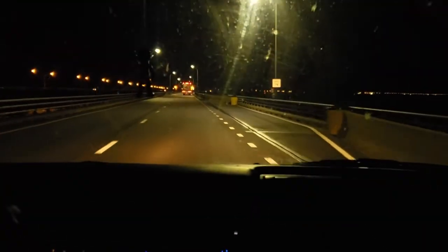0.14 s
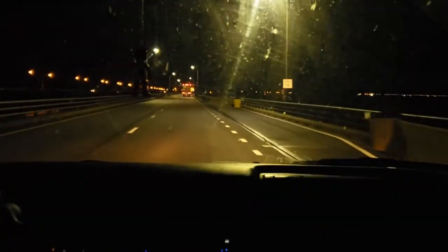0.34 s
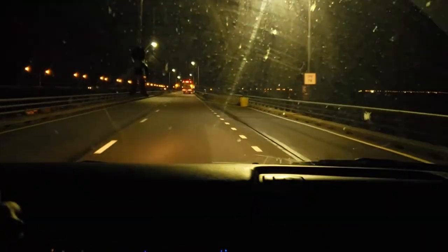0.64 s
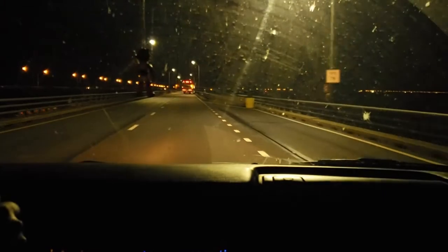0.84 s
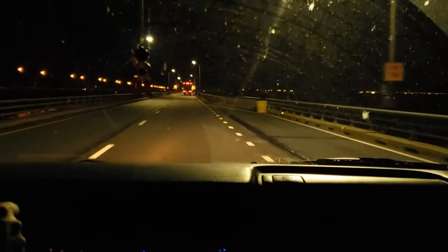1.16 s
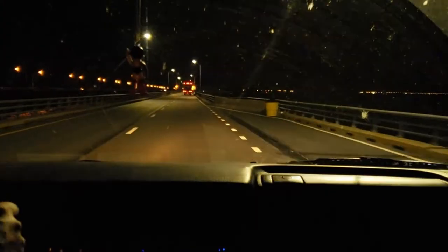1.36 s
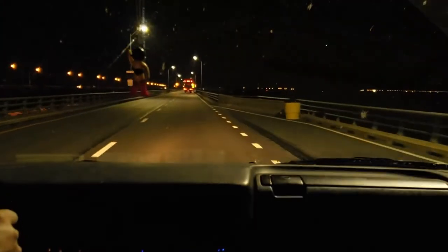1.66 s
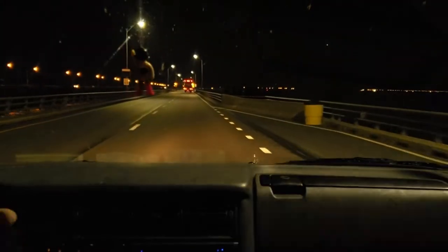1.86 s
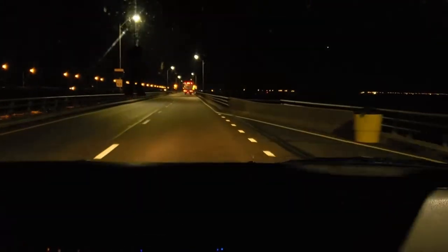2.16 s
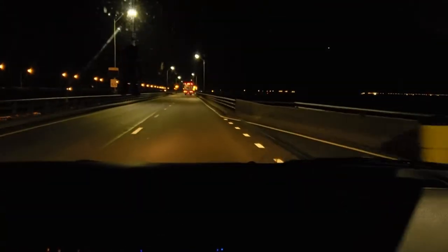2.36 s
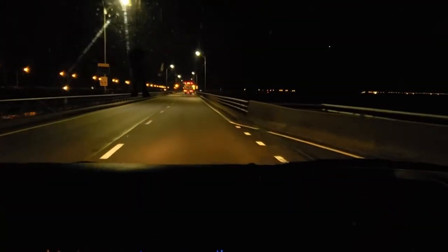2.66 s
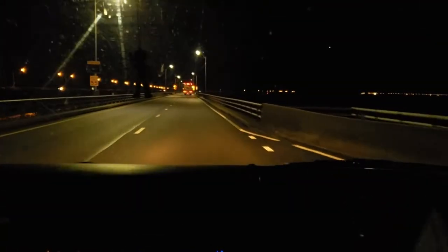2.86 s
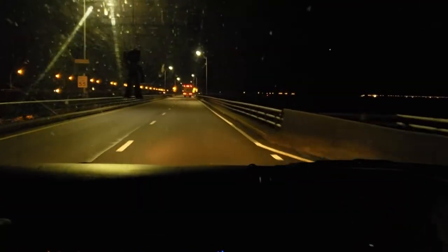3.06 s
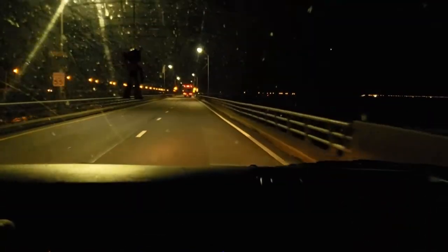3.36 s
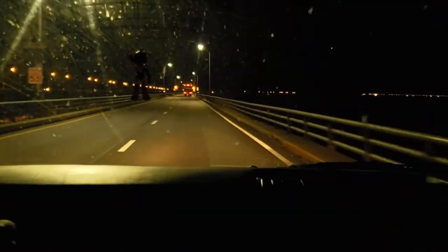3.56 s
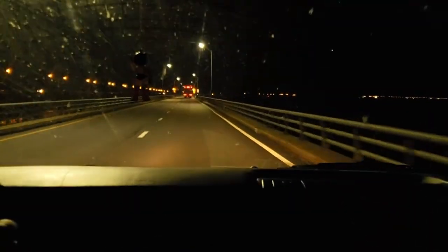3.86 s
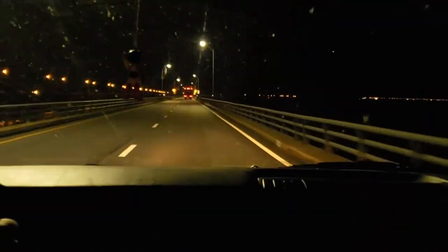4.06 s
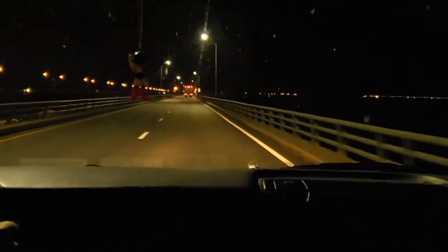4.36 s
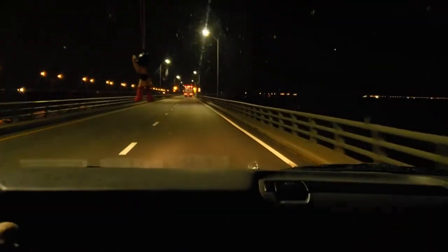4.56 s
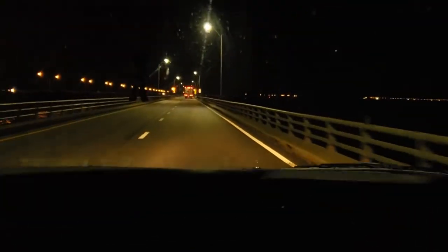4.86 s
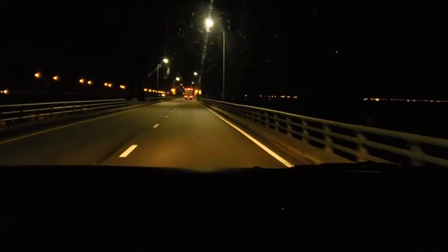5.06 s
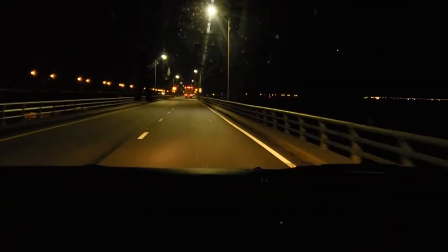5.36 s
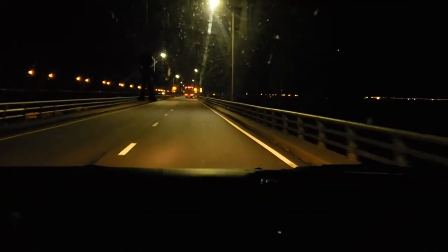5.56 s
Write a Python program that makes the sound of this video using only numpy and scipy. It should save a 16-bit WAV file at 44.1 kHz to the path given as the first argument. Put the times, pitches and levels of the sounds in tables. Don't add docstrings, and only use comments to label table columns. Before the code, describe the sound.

Inside a van at steady highway speed: deep booming cabin, engine hum, tyre roar and wind hiss, with a brief creaky microphone bump early on.

```python
import sys
import numpy as np
from scipy import signal
from scipy.fft import rfft, irfft, next_fast_len
from scipy.io import wavfile
from scipy.ndimage import uniform_filter1d, map_coordinates

SR = 44100
rng = np.random.default_rng(int(sys.argv[2]) if len(sys.argv) > 2 else 0)


def put_to_file(sound):
    columns = np.atleast_2d(sound).T
    safe = np.clip(columns, -1, 1)
    whole_steps = np.round(safe * 32767)
    wavfile.write(sys.argv[1], SR, whole_steps.astype(np.int16))


def invert_db(x):
    u = np.asarray(x, float) / 20
    return 10 ** u


N = 252252

# frequency_hz, likeness_0_to_1, right_leads_rad, left_minus_right_db
MICROPHONE_PAIR = [(60, .96, 0, 0), (270, .96, .1, -.5), (500, .55, .9, -.5), (650, .5, -.3, -1.5),
                   (850, .4, .6, -1.5), (1150, .8, 2.7, -1), (1450, .8, 2.9, -1), (1570, .25, 2.4, -1),
                   (1750, .7, 3.1, -1), (2300, .35, 4.6, -1), (3000, .6, 6, -1), (4000, .4, 3.2, -1.5),
                   (5000, .4, .3, -1), (6000, .35, 3.1, -1), (7000, .3, 0, 0), (15000, .2, 9.4, 0)]

# frequency_hz, level_db_per_hz
BOOM = [(20, -19), (35, -4.5), (50, 11), (65, 7.5), (80, 4.5), (105, -1), (125, -7), (160, -60)]
DRONE = [(70, -30), (100, -1.5), (140, -4), (185, -12), (225, -8.5), (270, -12.5), (320, -10.5), (400, -15),
         (550, -19), (700, -25.5), (900, -77.5)]
ROAR = [(450, -34), (600, -11.5), (800, -6.5), (1150, -2), (1400, -6), (1600, -10), (1800, -8.5),
        (2000, -6), (2400, -13), (3100, -14.5), (3450, -19), (3750, -27.5), (4500, -43)]
HISS = [(3000, -24), (3600, 3), (4200, 2.5), (5000, -1), (5800, -3.5), (6500, -3), (7400, -8), (9400, -3),
        (10400, -7.5), (11600, -5), (12800, -11), (14000, -13), (15700, -18), (17000, -40)]
ROAR_DB, DRONE_DB, HISS_DB, BOOM_DB = -37.5, 2.5, -16.5, -34.5
# time_s, hiss_rise_db, half_length_s
GUSTS = [
    (0.156, 2, 0.29),
    (0.524, 2, 0.23),
    (1.344, 4, 0.058),
    (1.784, 2, 0.12),
    (2.916, 1, 0.15),
    (3.494, -1, 0.23),
    (3.757, 6.5, 0.1),
    (4.25, 2.5, 0.3),
    (4.8, 0, 0.27),
    (5.305, 1.5, 1),
]
GUST_IN_ROAR = 0.62
# time_s, boom_rise_db
HEAVES = [(.24, 12.5), (.5, 12.5), (.7, 8.5), (.85, 11.5), (1.0, 11.5), (1.2, 13), (1.4, 1), (1.57, 8.5),
          (1.72, 5), (1.93, 8), (2.08, 9), (2.34, 10), (2.62, 11), (2.9, 12), (3.08, 7), (3.3, 10.5),
          (3.5, 2), (3.71, 7), (3.92, 10), (4.2, 2), (4.47, 5.5), (4.7, 8), (4.88, 11), (5.1, -4),
          (5.32, 9), (5.5, 6), (5.63, 5)]
HEAVE_HALF_S = 0.1
# start_s, peak_db, pitch_hz
JOLTS = [(0.206, -24, 62), (0.491, -12, 66.4), (0.85, -27, 66), (0.938, -17, 64.4), (1.909, -14, 60),
         (2.97, -17, 110), (3.94, -4.5, 68), (4.009, -12.5, 83), (4.861, -4, 65), (4.938, -5.5, 83),
         (5.079, -9, 59.7)]

# time_s, cycle_hz
SPEED = [
    (0, 24.28),
    (5.72, 23.92),
]
# time_s, firing_tone_over_mean_db
LOAD = [(0, -6), (.3, 0.5), (.6, -8), (.9, 0), (1.25, -1.5), (1.5, -1), (1.8, -5.5), (2.25, 3.5),
        (2.6, -2.5), (3.0, 2.5), (3.35, 0), (3.7, 0.5), (4.05, -6), (4.3, 1.5), (4.6, 0), (5.2, 0),
        (5.55, 4), (5.72, 2.5)]
# order, level_under_firing_octave_db
WEAK_ORDERS = [(2, 2), (4, -31), (7, -11.5), (9, -11.5), (12, -10), (13, -18), (14, -15.5), (15, -10),
               (19, -20), (20, -17.5), (22, -23), (23, -24.5), (25, -27), (26, -17.5), (28, -24), (30, -24),
               (31, -23)]
# order, level_under_firing_octave_db
CLATTER_ORDERS = [(60, -41), (62, -35), (64, -36), (65, -33), (66, -38), (67, -39), (69, -38), (79, -39),
                  (81, -37), (84, -36), (85, -29), (86, -33), (89, -39)]
FIRING_DB, OCTAVE_DB, OCTAVE_FOLLOWS = -27.5, -36, 0.14
MESH_DB, MESH_RISE_DB_PER_S, MESH_FOLLOWS = -53, 1.02, 0.19

# start_s, pitch_hz, first_push_or_pull_sign, left_db, right_db
BUMPS = [
    (1.4265, 74, -1, -13.5, -44),
    (1.447, 140, 1, -14, -40),
    (1.4545, 290, 1, -19, -40),
    (1.458, 108, 1, -7, -28),
    (1.4625, 100, -1, -40, -16),
    (1.4675, 270, 1, -19, -40),
    (1.4735, 205, 1, -16, -30),
    (1.479, 330, 1, -22, -40),
    (1.546, 150, 1, -19, -29),
    (1.614, 105, 1, -24, -26),
]
# start_s, peak_db, ring_hz, bright_edge_db
SLIPS = [(1.3797, -14, 1050, -30), (1.381, -19, 600, -30), (1.3875, -19, 1300, -22), (1.389, -14, 900, -24),
         (1.391, -16, 1600, -19), (1.3955, -20, 1000, -24), (1.3992, -10, 1500, -21), (1.4015, -9, 950, -9),
         (1.4035, -18, 600, -30), (1.4075, -20, 1100, -30), (1.4095, -19, 1300, -30),
         (1.4107, -10, 1000, -26), (1.4173, -4, 800, -24), (1.4186, -12, 760, -6), (1.4201, -9, 400, -8),
         (1.4226, -15, 900, -28), (1.4255, -22, 800, -10), (1.4266, -16, 700, -26),
         (1.4283, -17, 1250, -35), (1.4315, -24, 900, -26), (1.4545, -10, 650, -55),
         (1.4725, -19, 400, -55), (1.501, -17, 1200, -41), (1.5055, -20, 900, -45), (1.510, -18, 1000, -41),
         (1.515, -23, 800, -45), (1.520, -22, 1100, -45), (1.527, -22, 800, -45), (1.5495, -13, 380, -30),
         (1.556, -25, 1000, -45), (1.5615, -20, 900, -39), (1.572, -22, 430, -50), (1.582, -23, 400, -50)]
# time_s, level_db
RUB = [(1.375, -60), (1.381, -32), (1.415, -29), (1.43, -33), (1.445, -40), (1.46, -33), (1.495, -33),
       (1.515, -39), (1.535, -42), (1.555, -33), (1.6, -44), (1.64, -60)]
# frequency_hz, level_db_per_hz
SKIN = [(170, -40), (260, -9), (340, 0), (430, -3), (600, -12), (1500, -28), (4000, -46), (9000, -64)]
# time_s, level_db
SCRATCH = [
    (1.376, -70),
    (1.381, -37),
    (1.385, -41),
    (1.39, -34),
    (1.402, -34),
    (1.406, -42),
    (1.42, -34),
    (1.43, -40),
    (1.44, -70),
]
# frequency_hz, level_db_per_hz
GRILLE = [(1000, -30), (1600, -3), (2200, 0), (3200, -8), (5500, -24), (11000, -36), (16000, -46)]

# time_s, gain_db
LIMITER = [
    (1.375, 0),
    (1.385, -7),
    (1.43, -7),
    (1.44, -14),
    (1.455, -16),
    (1.47, -10),
    (1.49, -4),
    (1.52, -1.5),
    (1.58, 0),
]
# time_s, share_of_bass_left
WIND_CUT = [
    (1.365, 1),
    (1.378, .03),
    (1.53, .03),
    (1.59, .08),
    (1.61, .5),
    (1.635, .3),
    (1.65, .15),
    (1.68, .8),
    (1.75, 1),
]
GAIN_DROP_S, GAIN_FALL_S, GAIN_DROP_DB = 1.36, 0.16, -4
GAIN_HOLD_S, GAIN_BACK_S = 1.0, 0.79


def along(points, hz, axis=1):
    rows = np.asarray(points, float)
    return np.interp(np.log(hz + 1), np.log(rows[:, 0] + 1), rows[:, axis])


def curves(rows):
    s, *columns = np.transpose(rows)
    return [np.interp(np.arange(N) / SR, s, column) for column in columns]


def unit(x):
    return x / np.sqrt(np.mean(x ** 2) + 1e-20)


def wobble(rate_hz):
    knots = rng.standard_normal(int(N * rate_hz / SR) + 4)
    return map_coordinates(knots, [np.arange(N) * rate_hz / SR])


def humps(start_s, rise_db, half_s):
    t = np.arange(0, N + 64, 64) / SR
    events = np.broadcast(start_s, rise_db, half_s)
    rise = sum(db * np.exp(-((t - s) / half) ** 2) for s, db, half in events)
    return np.interp(np.arange(N) / SR, t, rise)


def rush(spectrum, pulse=1):
    m = next_fast_len(N + 8192)
    hz = np.fft.rfftfreq(m, 1 / SR)
    shared, own_left, own_right = rfft(pulse * rng.standard_normal((3, N)), m)
    alike = np.clip(along(MICROPHONE_PAIR, hz), 0, 1)
    half_turn = np.exp(.5j * along(MICROPHONE_PAIR, hz, axis=2))
    half = half_turn / invert_db(along(MICROPHONE_PAIR, hz, axis=3) / 2)
    left = (np.sqrt(alike) * shared + np.sqrt(1 - alike) * own_left) / half
    right = (np.sqrt(alike) * shared + np.sqrt(1 - alike) * own_right) * half
    coloured = [left, right] * invert_db(along(spectrum, hz))
    return unit(irfft(coloured, m)[:, :N])


def tone(turns, level_db, lead_rad):
    phase = 2 * np.pi * turns + [[-lead_rad / 2], [lead_rad / 2]]
    return np.sqrt(2) * invert_db(level_db) * np.sin(phase)


def road(turns):
    gust_db = humps(*np.transpose(GUSTS))
    heave_db = humps(*np.transpose(HEAVES), HEAVE_HALF_S)
    flutter = wobble(19)
    beat = 0.094 * np.sin(2 * np.pi * turns)
    beat += 0.15 * np.sin(4 * np.pi * turns)
    beat += 0.054 * np.sin(10 * np.pi * turns)
    boom = rush(BOOM)
    boom_power = np.abs(uniform_filter1d(np.mean(boom ** 2, axis=0), SR // 10))
    boom /= np.sqrt(boom_power + 0.035)
    drone = invert_db(DRONE_DB + 4.5) * rush(DRONE)
    roar_db = GUST_IN_ROAR * gust_db - 0.52 + 0.097 * flutter + 1.03 * wobble(30)
    roar = invert_db(roar_db) * rush(ROAR, 1 + beat)
    hiss_db = HISS_DB + gust_db - 0.13 + 0.62 * flutter + 0.6 * wobble(21.99)
    hiss = invert_db(hiss_db) * rush(HISS, 1 + beat / 3)
    return invert_db(BOOM_DB + heave_db) * boom + invert_db(ROAR_DB) * (drone + roar + hiss)


def jolts():
    out = np.zeros(N + SR)
    for s, db, hz in JOLTS:
        cycles = np.arange(int(1.7 * SR / hz)) * hz / SR
        swing = np.sin(2 * np.pi * cycles) * np.sin(np.pi * cycles / cycles[-1])
        out[round(s * SR):][:len(cycles)] -= invert_db(db - 7.5) * swing
    return out[:N]


def engine(turns):
    load_db = curves(LOAD)[0]
    firing_db = FIRING_DB + load_db
    octave_db = OCTAVE_DB + OCTAVE_FOLLOWS * load_db
    mesh_db = MESH_DB + MESH_RISE_DB_PER_S * np.arange(N) / SR + MESH_FOLLOWS * load_db
    hum = tone(5 * turns, firing_db + 2 * wobble(8), .12)
    hum += tone(10 * turns, octave_db + 2.2 + .3 * wobble(5), .2)
    hum += tone(24 * turns, mesh_db + 2.8 + .3 * wobble(5), .3)
    for order, db in WEAK_ORDERS:
        unsteady_turns = order * turns + rng.random() + 0.035 * wobble(6.5)
        hum += tone(unsteady_turns, octave_db + db + 1.3 * wobble(6.9), 0.84)
    for order, db in CLATTER_ORDERS:
        unsteady_turns = order * turns + rng.random() + .05 * wobble(7)
        hum += tone(unsteady_turns, octave_db + db + 7.5 + 3 * wobble(5), .5)
    return hum


def gain_control():
    low_s = GAIN_DROP_S + GAIN_FALL_S
    times = [GAIN_DROP_S, low_s, low_s + GAIN_HOLD_S, low_s + GAIN_HOLD_S + GAIN_BACK_S]
    gain_db = np.array([0, 1, 1, 0]) * GAIN_DROP_DB
    return invert_db(np.interp(np.arange(N) / SR, times, gain_db))


def wind_cut(x):
    bass = signal.sosfiltfilt(signal.butter(3, 260, fs=SR, output="sos"), x)
    return x - (1 - curves(WIND_CUT)[0]) * bass


def bumps():
    out = np.zeros((2, N))
    for s, hz, way, left_db, right_db in BUMPS:
        cycles = np.arange(int(1.5 * SR / hz)) * hz / SR
        swing = way * np.sin(2 * np.pi * cycles) * np.sin(np.pi * cycles / 1.5) ** .5
        out[:, round(s * SR):][:, :len(cycles)] += swing * [[invert_db(left_db)], [-invert_db(right_db)]]
    return out


def finger():
    creak = invert_db(curves(RUB)[0] + 3 * wobble(300)) * rush(SKIN)[0]
    creak += invert_db(curves(SCRATCH)[0] + 4 * wobble(400)) * rush(GRILLE)[0]
    t = np.arange(SR // 50) / SR
    for s, db, hz, edge_db in SLIPS:
        rise_cycles = .15 if edge_db > -40 else .35
        ring = np.sin(2 * np.pi * hz * t) * invert_db(-60 * t / (.0045 + 1.2 / hz))
        snap = .05 / rise_cycles * np.sin(2 * np.pi * 2.2 * hz * t) * invert_db(-60 * t / .003)
        grit = uniform_filter1d(rng.standard_normal(len(t)), size=3)
        edge = invert_db(edge_db + 1 - 60 * t / .004) * grit
        onset = 1 - np.exp(-t * hz / rise_cycles)
        creak[round(s * SR):][:len(t)] += invert_db(db + 2.5) * onset * (ring + snap + edge)
    return creak * invert_db([[-24], [0]])


def scene():
    turns = np.cumsum(curves(SPEED)[0]) / SR
    cabin = (road(turns) + engine(turns)) * gain_control() + jolts()
    cabin[1] = wind_cut(cabin[1]) * invert_db(curves(LIMITER)[0] + 0.47)
    return cabin + bumps() + finger()


def band_limit(x):
    return signal.sosfilt(signal.butter(12, 15750, fs=SR, output="sos"), x)


def record(dry):
    return band_limit(dry)


dry = scene()
out = record(dry)
put_to_file(out)
```